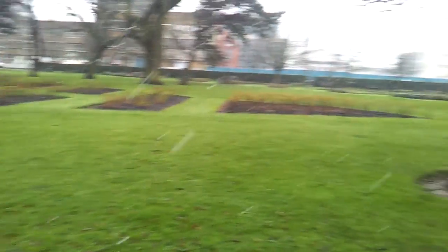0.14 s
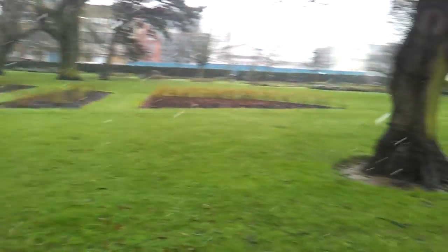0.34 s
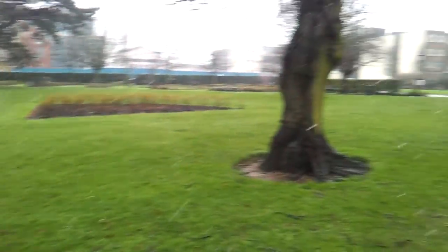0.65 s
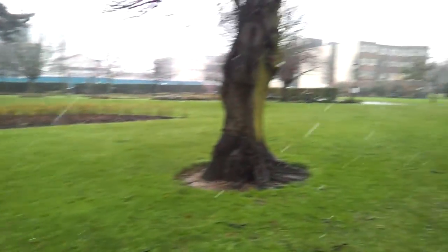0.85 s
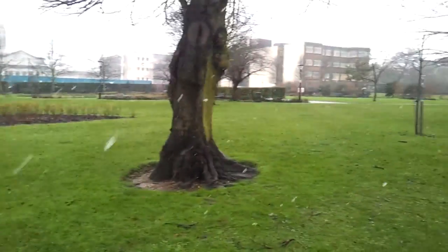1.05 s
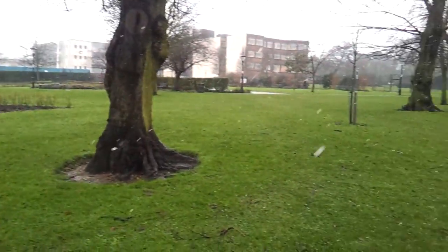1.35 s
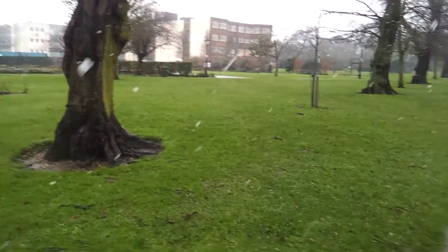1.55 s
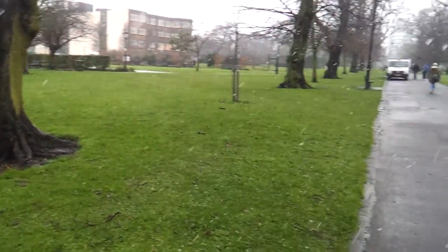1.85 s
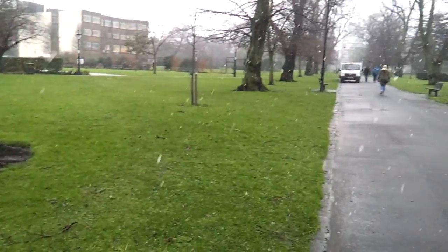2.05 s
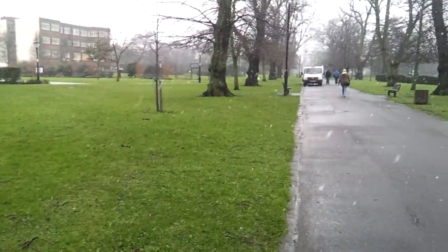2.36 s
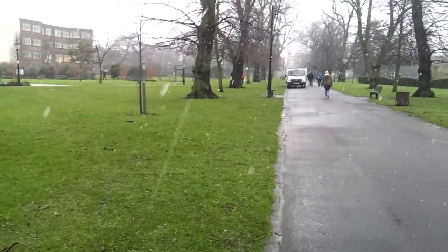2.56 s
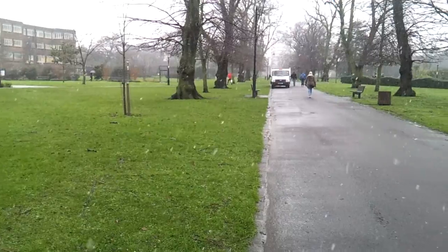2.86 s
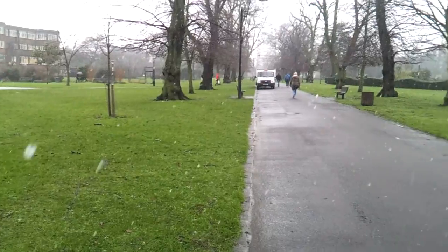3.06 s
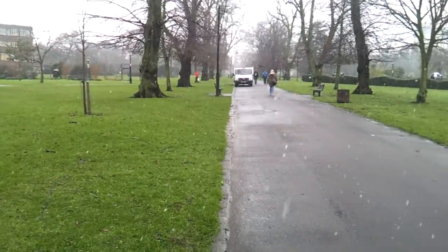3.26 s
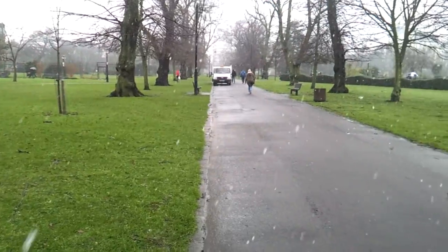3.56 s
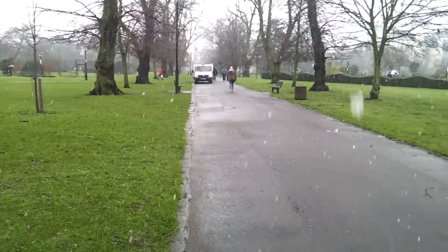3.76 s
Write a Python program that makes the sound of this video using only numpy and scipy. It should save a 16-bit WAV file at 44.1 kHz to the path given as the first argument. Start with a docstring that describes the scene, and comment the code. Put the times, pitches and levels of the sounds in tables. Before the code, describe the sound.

Steady hiss of falling sleet outdoors, with faint close ticks and far traffic rumbling behind.

```python
"""Sleet and wet snow hiss on the grass and path of an open park, heard from a hand-held camera that turns.
Countless tiny impacts blend into the hiss, and a few pellets tick close by.
Behind it, town traffic murmurs and a far engine drones on two low tones.
A sleeve rustles during the turn; a finger bumps the camera's case and scuffs over it."""
import sys
import numpy as np
from scipy import signal
from scipy.fft import rfft, irfft
from scipy.io import wavfile
from scipy.ndimage import uniform_filter1d

SR = 44100
rng = np.random.default_rng(int(sys.argv[2]) if len(sys.argv) > 2 else 0)


def pcm_store(signal):
    """Save signal as 16-bit PCM."""
    levels = np.round(np.clip(np.atleast_2d(signal), -1, 1) * 32767)
    wavfile.write(sys.argv[1], SR, levels.astype(np.int16).T)


N = 171990
T = np.arange(N) / SR
FREQS = np.arange(N // 2 + 1) * SR / N

# tone colour of the sleet's hiss (f/Hz, relative level/dB)
SLEET_COLOUR = [(700, -3.5), (1500, -2.5), (2500, 2.5), (3500, 0), (5000, 1), (6300, -1), (6900, -7.5),
                (7500, -5), (9000, -16.5)]
# how loud the hiss is over time (t/s, level/dB)
SLEET_LOUDNESS = [(0, -47), (.5, -47.5), (1.1, -46.5), (1.35, -49), (1.51, -50), (1.6, -46), (2.05, -46.5),
                  (2.4, -48.5), (2.65, -50), (3.2, -49.5), (3.5, -52.5), (3.9, -50)]
# tone colour of the far traffic (f/Hz, relative level/dB)
TRAFFIC_COLOUR = [(12, -25), (20, -13.5), (28, -1.5), (58, 0), (100, -2), (125, 0.5), (160, -4),
                  (250, -3.5), (400, -10), (600, -10), (900, -8), (1450, -11), (2200, -18), (3500, -25.5),
                  (7000, -43)]
# rise and fall of the tyre roar as the camera turns (t/s, relative level/dB)
TYRE_ROAR = [(0, 1), (.8, -0.05), (1.3, 0.5), (2.0, -0.5), (2.7, -.5), (3.45, 0), (3.9, -2.8)]
# the far engine's tones (f/Hz, width/Hz, level/dB)
ENGINE_TONES = [(62, 14, -49.5), (85.7, 4, -51)]
# rise and fall of both tones (t/s, relative level/dB)
ENGINE_SWELL = [(0, -1), (1.2, -8.5), (1.75, 1.5), (2.3, 0), (2.7, -8), (3.6, -0.5), (3.9, -4)]
# strokes of the sleeve (t/s, length/s, level/dB)
SLEEVE_STROKES = [(0.025, .055, -45.5), (0.106, .055, -44.5), (.2, 0.058, -44.5), (2.025, 0.054, -43.5),
                  (2.162, .12, -49), (2.317, .06, -46.5), (2.408, .055, -46)]
# tone colour of the rubbing cloth (f/Hz, relative level/dB)
CLOTH_COLOUR = [(700, -17), (1500, 3), (2200, -3), (2800, -8), (3800, -8.5), (6500, -13), (9000, -29)]
# pellets landing close by (t/s, level/dB)
PELLET_HITS = [(.178, -38), (.8615, -37), (.935, -40), (.984, -34), (1.002, -35), (2.037, -37.5),
               (3.0905, -38), (3.215, -43), (3.593, -36.5), (3.628, -41)]
# tone colour of a pellet's splash (f/Hz, relative level/dB)
PELLET_COLOUR = [(1500, -19), (3500, -11), (4700, 4), (6500, 4), (9000, -8.5)]
# finger scuffs on the case (t/s, length/s, starting level/dB)
FINGER_SCUFFS = [(.9875, 0.023, -38.5), (1.037, 0.024, -41.5), (1.5345, 0.02, -28.5), (1.556, .019, -31.5)]
# tone colour of skin rubbing the case (f/Hz, relative level/dB)
SKIN_COLOUR = [(300, -12), (900, -2), (1500, 7), (2200, -6), (3000, -6), (3800, 0), (4900, 2), (6100, 7.5),
               (6950, -2.5), (7300, 6), (7800, -3), (8800, 0)]
# finger bumps on the case (t/s, relative level/dB, contact time/s)
FINGER_BUMPS = [(.9882, 0, .0009), (2.432, -13.5, 0.0012), (3.3086, -4.5, 0.0028)]
# tones the bumped case rings with (f/Hz, level/dB, time to fade by 60 dB/s)
CASE_TONES = [(182, -22.5, 0.034), (290, -17.5, .018), (467, -28, 0.011)]


def gain(db):
    """Turn decibels into a number to multiply by."""
    return 10 ** (np.asarray(db) / 20)


def unit(x):
    """Scale a signal to an average strength (rms) of 1."""
    return x / np.sqrt(np.mean(x ** 2))


def curve(rows):
    """Join (time, value) rows with straight lines."""
    return np.interp(T, *np.array(rows).T)


def colour(x, points):
    """Give a signal a tone colour, then set its strength to 1."""
    hz, db = np.array(points).T
    shape_db = np.interp(np.log(np.maximum(FREQS, 1)), np.log(hz), db)
    return unit(irfft(rfft(x) * gain(shape_db), N))


def wander(per_s):
    """A smooth random wobble of strength 1 that changes about per_s times a second."""
    hold = max(int(SR / per_s), 1)
    steps = np.repeat(rng.standard_normal(N // hold + 1), hold)
    return unit(uniform_filter1d(uniform_filter1d(steps, hold), hold)[:N])


def octaves(x):
    """Split a signal into ten overlapping bands an octave apart, as (centre in Hz, band)."""
    octave = np.log2(np.maximum(FREQS, 20) / 20)
    spectrum = rfft(x)
    return [(20 * 2 ** k, irfft(spectrum * np.maximum(1 - abs(octave - k), 0), N)) for k in range(10)]


def grains(per_s, spread_db):
    """Tiny clicks at random moments, most weak and a few strong."""
    size = gain(spread_db * np.minimum(rng.exponential(size=N), 6))
    return (rng.random(N) < per_s / SR) * size * rng.choice([-1, 1], N)


def rough_tone(hz, width_hz):
    """Noise in a narrow band around a steady or moving pitch."""
    phase = 2 * np.pi * np.cumsum(hz + np.zeros(N)) / SR
    return unit(wander(width_hz * 2) * np.cos(phase) + wander(width_hz * 2) * np.sin(phase))


def strokes(rows, edge_s, fade_db_per_s=0):
    """Loudness of rubbing strokes: each rises, holds or fades, then stops."""
    loudness = np.zeros(N)
    for start, length, db in rows:
        edges = np.clip(np.minimum(T - start, start + length - T) / edge_s, 0, 1)
        loudness += edges * gain(db - fade_db_per_s * np.clip(T - start, 0, length))
    return loudness


def sleet(patter_db=-7, flicker_db=.5):
    """Countless far flakes merge into a hiss; nearer ones patter through it."""
    far = rng.standard_normal(N)
    near = gain(patter_db) * unit(grains(per_s=1800, spread_db=3.5))
    level_db = curve(SLEET_LOUDNESS) + flicker_db * wander(24.86)
    return colour(far + near, SLEET_COLOUR) * gain(level_db)


def traffic(level_db=-39, swell_db=.52, flicker_db=.85, roar_from_hz=600):
    """Far traffic murmurs; its tyre roar depends on where the camera points."""
    murmur = colour(rng.standard_normal(N), TRAFFIC_COLOUR)
    shared_db = level_db + swell_db * wander(2)  # the bands swell together but flicker alone
    roar_db = curve(TYRE_ROAR)
    return sum(band * gain(shared_db + flicker_db * wander(14) + roar_db * (hz > roar_from_hz))
               for hz, band in octaves(murmur))


def engine():
    """A far engine drones on two low, unsteady tones."""
    drone = sum(gain(db) * rough_tone(hz, width) for hz, width, db in ENGINE_TONES)
    return drone * gain(curve(ENGINE_SWELL))


def sleeve(rasp_hz=1750, rise_hz=803, rasp_db=-4.5):
    """Cloth swishes softly; the rasp of its weave rises in pitch through each stroke."""
    progress = sum((T >= start) * (T < start + length) * (T - start) / length
                   for start, length, _ in SLEEVE_STROKES)
    rasp = gain(rasp_db) * rough_tone(rasp_hz + rise_hz * progress, width_hz=450)
    swish = colour(rng.standard_normal(N), CLOTH_COLOUR)
    return strokes(SLEEVE_STROKES, edge_s=.012) * (swish + rasp)


def pellets(decay_s=.002):
    """Each close pellet bursts in a short, bright splash."""
    bursts = sum(gain(db) * (T >= start) * np.exp(-np.maximum(T - start, 0) / decay_s)
                 for start, db in PELLET_HITS)
    return bursts * colour(rng.standard_normal(N), PELLET_COLOUR)


def finger_scuffs():
    """Skin sticks and slips over the case, making a rush of tiny clicks."""
    slips = colour(grains(per_s=7000, spread_db=2), SKIN_COLOUR)
    return strokes(FINGER_SCUFFS, edge_s=.0007, fade_db_per_s=170) * slips


def finger_bumps():
    """Each soft push makes the case ring briefly; a longer contact gives a gentler start."""
    sound = np.zeros(N)
    for start, bump_db, contact_s in FINGER_BUMPS:
        age = np.maximum(T - start, 0)
        ring = sum(gain(db - 60 * age / fade_s) * np.sin(2 * np.pi * hz * age)
                   for hz, db, fade_s in CASE_TONES)
        sound += gain(bump_db) * ring * np.minimum(age / contact_s, 1)
    return sound


def scene():
    """All the sounds add up at one microphone."""
    return (sleet() + traffic() + engine() + sleeve() + pellets() + finger_scuffs() + finger_bumps())[None]


def record(dry, slope_hz=(6965, 7900), drop_db=-24, top_hz=8800):
    """The camera turns the treble down steeply, then cuts off the very top."""
    dulled = irfft(rfft(dry) * gain(np.interp(FREQS, slope_hz, [0, drop_db])), N)
    low_pass = signal.ellip(8, .2, 70, top_hz, fs=SR, output="sos")
    return signal.sosfilt(low_pass, dulled)


dry = scene()
out = record(dry)
pcm_store(out)
```